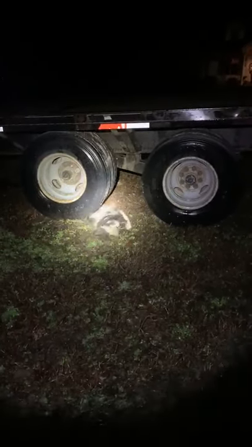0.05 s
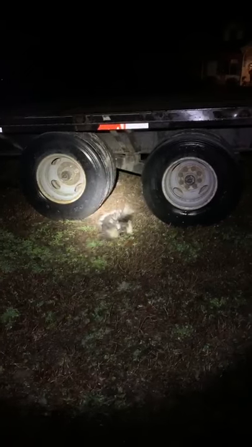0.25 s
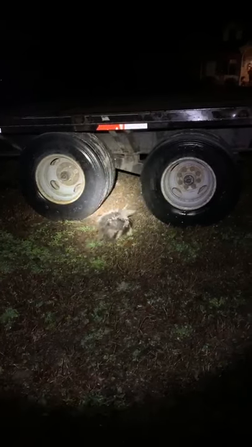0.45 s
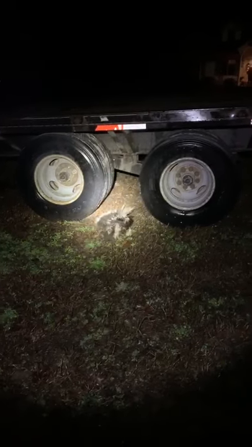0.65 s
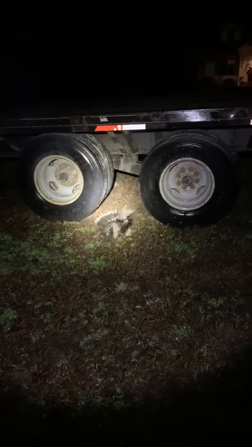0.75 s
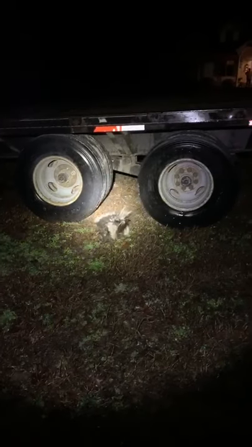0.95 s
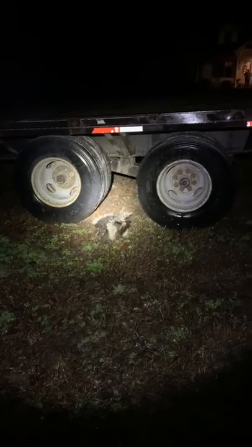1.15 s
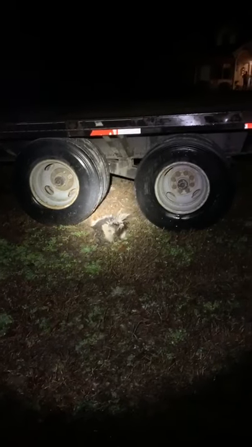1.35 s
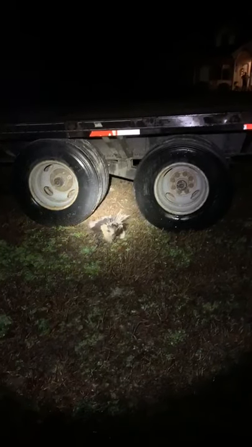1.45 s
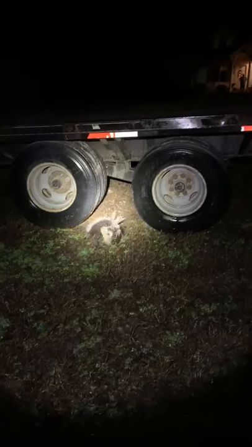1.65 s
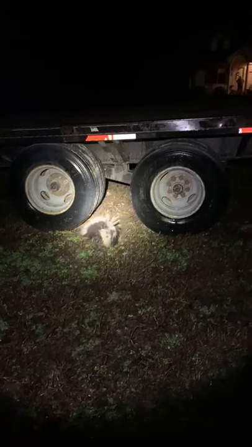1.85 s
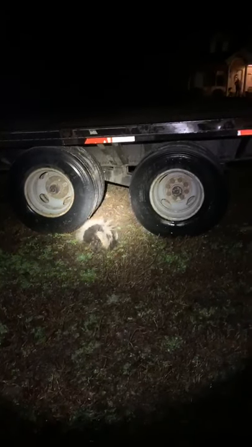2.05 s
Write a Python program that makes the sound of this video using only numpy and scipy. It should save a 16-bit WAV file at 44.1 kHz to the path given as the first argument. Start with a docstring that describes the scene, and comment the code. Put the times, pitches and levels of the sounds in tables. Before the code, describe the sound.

High, fluttering squeals break into rasp as skunks quarrel in a yard at night, twice at length and once briefly. Heard from a few metres off, they echo slightly, with soft grass scuffles, distant insects and a low hum behind.

```python
"""Under a trailer at night, skunks squabble a few metres away.
They give two long squeals and a short one. Each is a whistling voice near 2.4 kHz that a slower
flutter splits into side tones and that breaks into rasp. The squeals echo off the trailer.
The animals scuffle softly in the grass; insects chorus far off over a low rumble and hum."""
import sys
import numpy as np
from scipy import signal
from scipy.fft import rfft, irfft
from scipy.io import wavfile

SR = 44100
rng = np.random.default_rng(int(sys.argv[2]) if len(sys.argv) > 2 else 0)


def unload_audio(sound):
    """Save the sound as a 16-bit wav file, at the path given as the first command line argument."""
    columns = np.transpose(np.atleast_2d(sound))
    # keep every value between -1 and 1, then stretch to whole-number steps
    steps = np.round(np.clip(columns, -1, 1) * 32767)
    wavfile.write(sys.argv[1], SR, steps.astype(np.int16))


N = 92610
T = np.arange(N) / SR
HZ = np.fft.rfftfreq(N, 1 / SR)

# The tune of each squeal. Each row: time in seconds, pitch in Hz.
FIRST_PITCH = [(0.188, 2467), (0.204, 2461), (0.228, 2644), (0.242, 2754), (0.266, 2728), (0.285, 2664),
               (0.308, 2456), (0.336, 2513), (0.362, 2464), (0.372, 2317), (0.396, 2296), (0.412, 2161),
               (0.438, 2123), (0.455, 2150), (0.49, 2104)]
SECOND_PITCH = [(1.19, 1944), (1.206, 2040), (1.224, 2486), (1.23, 2460), (1.248, 2527), (1.274, 2354),
                (1.306, 2479), (1.35, 2494), (1.384, 2242), (1.404, 2225), (1.434, 2453), (1.452, 2356),
                (1.478, 2393), (1.505, 2340)]
THIRD_PITCH = [(1.795, 2431), (1.806, 2407), (1.815, 2651), (1.835, 2560), (1.87, 2590)]
# How loud each squeal is. Each row: time in seconds, base levels of harmonics one to three in dB.
FIRST_LEVELS = [(0.186, -58, -60, -83), (0.194, -47, -32, -70), (0.212, -35, -41, -53),
                (0.235, -22, -30, -43), (0.243, -27, -29, -42), (0.252, -21, -24, -38),
                (0.268, -20, -25, -39), (0.272, -29, -27, -41), (0.294, -34, -39, -47),
                (0.31, -36, -39, -50), (0.334, -33, -24, -39), (0.342, -34, -34, -36),
                (0.36, -34, -26, -40), (0.372, -34, -37, -45), (0.394, -33, -29, -42),
                (0.405, -43, -41, -49), (0.417, -34, -37, -43), (0.44, -38, -38, -43),
                (0.45, -32, -35, -41), (0.458, -43, -42, -49), (0.499, -55, -59, -65)]
SECOND_LEVELS = [(1.19, -55, -56, -79), (1.2, -31, -39, -55), (1.206, -40, -35, -56),
                 (1.214, -27, -34, -50), (1.234, -39, -26, -48), (1.262, -30, -26, -41),
                 (1.282, -31, -25, -44), (1.316, -27, -33, -38), (1.334, -36, -28, -38),
                 (1.342, -27, -35, -40), (1.35, -33, -31, -39), (1.364, -23, -29, -42),
                 (1.406, -33, -33, -52), (1.413, -28, -28, -46), (1.421, -34, -35, -47),
                 (1.433, -25, -24, -42), (1.443, -31, -33, -49), (1.457, -23, -26, -44),
                 (1.465, -36, -34, -46), (1.475, -22, -27, -48), (1.487, -29, -25, -51),
                 (1.503, -45, -50, -57), (1.511, -48, -51, -68)]
THIRD_LEVELS = [(1.793, -61, -64, -78), (1.797, -45, -35, -59), (1.799, -47, -28, -49),
                (1.819, -25, -34, -53), (1.825, -35, -35, -50), (1.835, -31, -37, -50),
                (1.875, -52, -57, -72)]
# How the voice breaks up. Each row: time in seconds, flutter depth, rasp depth.
FIRST_ROUGHNESS = [(.19, .2, .3), (.22, .08, .08), (.23, .55, .09), (.264, .75, .11), (.277, .9, .8),
                   (.305, .7, .85), (.33, .55, .22), (.356, .8, .25), (.37, .7, .5), (.39, .6, .3),
                   (.406, .8, .8), (.422, .4, .4), (.45, .6, .5), (.49, .6, 1.1)]
SECOND_ROUGHNESS = [(1.19, .5, .5), (1.215, .35, .25), (1.232, .2, .08), (1.246, .8, .15),
                    (1.259, .08, .06), (1.279, .08, .06), (1.29, .8, .13), (1.303, .15, .07),
                    (1.315, .5, .1), (1.326, .25, .08), (1.342, .9, .14), (1.353, .6, .14),
                    (1.366, 1.4, .22), (1.385, .4, .3), (1.41, .45, .3), (1.423, .8, .3), (1.436, .35, .2),
                    (1.455, 1.15, .25), (1.48, 1.2, .18), (1.505, .4, .6)]
THIRD_ROUGHNESS = [(1.795, .05, .1), (1.804, .1, .15), (1.812, .6, .45), (1.82, .45, .3), (1.832, 1.0, .5),
                   (1.87, .5, .7)]
# Harmonics, the tones at 1 to 4 times the pitch. Each row: dB added to the base level,
# strength of the side tones above, strength of those below, strength of the rasp.
VOICE_HARMONICS = [(-1.87, 0.73, 0.083, 0.93), (-0.86, 0.21, 0.29, 1.8), (1, 1.1, 0.7, 3),
                   (-7, 1.8, .8, 2.5)]
# Air hissing in the throat. Each row: frequency in Hz, relative level in dB.
BREATH_SPECTRUM = [(300, -14.5), (700, -21), (1300, -59), (2000, -29), (3000, 0.5), (5000, -8), (7000, -16),
                   (10500, 1.5), (12000, 20)]
# How the throat colours the voice. Each row: frequency in Hz, boost in dB.
THROAT_BOOST = [(1500, -1.8), (2500, 0.85), (2870, 4), (3250, 1), (3600, 2.5), (4300, -1.5), (4800, 0),
                (5900, 5.4), (6400, 1), (7300, -2), (8600, -0.1), (9000, -9.5), (9500, -1.9), (11000, -2.7)]
# Scuffles in the grass. Each row: peak time, rough rise time and rough fall time in seconds,
# level in dB, centre frequency in Hz, width in octaves.
GRASS_SCUFFLES = [(.278, 0.05, 0.062, -46, 844, 1), (.41, 0.11, 0.095, -56.5, 520, 0.81),
                  (0.623, 0.06, 0.069, -49, 962, 0.53), (.6, 0.017, .05, -54, 492, 0.2),
                  (1.42, .07, 0.11, -62.5, 556, 0.52), (1.506, 0.0053, 0.011, -49, 720, 0.2),
                  (1.88, 0.077, .07, -65, 650, 0.46)]
# Echoes off the trailer. Each row: delay in seconds, gain (a minus flips the wave).
TRAILER_ECHOES = [(.0023, .16), (.0037, .12), (.0051, -.17), (.0072, -.12), (.0094, .14), (.0131, -.09),
                  (.017, .08)]
# How long the yard rings. Each row: frequency in Hz, seconds to fade by 60 dB.
YARD_DECAY = [(300, .35), (2500, .38), (5000, 0.24), (10000, 0.65)]
# Far insects. Each row: centre frequency in Hz, half width in Hz, level in dB, throb depth.
INSECT_CHORUSES = [(2796, 304, -61, 0.072), (6230, 77, -93, 0.12)]
# One nearer insect. Each row: time in seconds, level in dB.
NEAR_INSECT_LEVEL = [(0, -81), (.2, -78.5), (.75, -97), (.95, -70.5), (1.15, -75), (1.6, -99.5),
                     (1.75, -77.5), (2.1, -91.5)]
# The rumble of the night air. Each row: frequency in Hz, relative level in dB.
RUMBLE_SPECTRUM = [(20, -34.5), (33, -27.5), (42, -4), (52, -5.5), (72, -5), (110, -4), (170, -5.5),
                   (300, -15.5), (420, -17), (560, -23.5), (800, -28.5), (1500, -32.5), (2100, -40),
                   (3400, -43), (5300, -54.5), (7000, -44.5), (10500, -48), (12500, -56.5)]
# The hum. Each row: frequency in Hz, level in dB.
HUM_TONES = [(72, -60), (216, -66)]
# Timing of direct sound at the two microphones. Each row: frequency in Hz, left's lead in radians.
DIRECT_PHASE = [(0, 0), (300, -.25), (750, .6), (1200, -.7), (2120, 0), (2350, 1.3), (2460, 2.2),
                (2750, 2.05), (2850, 1.65), (3050, 1.8), (4300, 1.55), (4800, 2.3), (5000, 2.55),
                (5200, 3.3), (5550, 3.4), (5700, 3.8), (6150, 3.95), (6550, 5), (7800, 6.1), (9150, 6.3),
                (9400, 7), (10800, 8.3)]
# Balance of direct sound, then of sound from all around. Each row: frequency in Hz, left minus right in dB.
DIRECT_BALANCE = [(60, -1.5), (200, -3.5), (340, -3.5), (700, -.8), (2050, -.3), (2370, -10), (2520, -1.2),
                  (2900, 0), (4200, 1), (4800, -.9), (6000, -.2), (11000, 0)]
AROUND_BALANCE = [(60, -2.3), (200, -2.5), (350, -4), (800, -0.1), (3000, 0.3)]
# How alike left and right are for sound from all around. Each row: frequency in Hz, likeness (1 = same).
AROUND_LIKENESS = [(50, .99), (150, .94), (400, .72), (1100, .65), (2000, .1), (2800, -.1), (10000, .2)]

TREMOR, TREMOR_HZ = .007, 70  # slight pitch shake: share of the pitch, speed
JITTER, JITTER_HZ = 0.024, 190  # faster pitch shake, at a rasp depth of 1
FLUTTER_RATIO, FLUTTER_WANDER = .196, .05  # flutter rate as a share of the pitch, and how much it strays
SIDE_FALL = .25  # gain from one side tone to the next
SHIMMER_DB, SHIMMER_HZ = 3.6, 65  # how far and how fast the side tones swell and fade
RASP_WIDTH_HZ = 360
BREATH_DB, TAIL_DB, RUMBLE_DB = -23.5, -20.5, -56.5
NEAR_INSECT_HZ, NEAR_INSECT_HALF_WIDTH_HZ = 4520, 300
TREBLE_LIMIT_HZ = 11300


def squeal(pitch, level, roughness):
    """A shrill voice: a slower flutter adds tones above and below each harmonic, and rasp smears it."""
    (hz,), levels, (flutter, rasp) = curves(pitch), curves(level), curves(roughness)
    start, end = level[0][0], level[-1][0]
    gate = np.clip(np.minimum(T - start, end - T) / 0.00085, 0, 1)
    shake = 1 + TREMOR * wander(TREMOR_HZ) + JITTER * rasp * wander(JITTER_HZ)
    phase = phase_of(hz * shake)
    flutter_hz = hz * FLUTTER_RATIO * (1 + FLUTTER_WANDER * wander(JITTER_HZ))
    beat = np.exp(1j * phase_of(flutter_hz))  # multiplying by this shifts a tone up by flutter_hz
    side_tones = beat * (1 + SIDE_FALL * beat * (1 + SIDE_FALL * beat))  # three, each weaker than the last
    voice = np.zeros(N)
    for order, (db, upper, lower, rasp_share) in enumerate(VOICE_HARMONICS, 1):
        up = flutter * upper * amp(SHIMMER_DB * wander(SHIMMER_HZ))
        down = flutter * lower * amp(SHIMMER_DB * wander(SHIMMER_HZ))
        smear = rasp_share * rasp * unit_level(wander(RASP_WIDTH_HZ) + 1j * wander(RASP_WIDTH_HZ))
        breakup = 1 + up * side_tones - down * side_tones.conj() + smear
        # Dividing by this size keeps a rough voice as loud as a smooth one.
        size = np.sqrt(1 + (up ** 2 + down ** 2) * (1 + SIDE_FALL ** 2) + (rasp_share * rasp) ** 2)
        tone = breakup / size * np.exp(1j * order * phase)
        base_db = levels[min(order - 1, 2)]  # the fourth harmonic follows the third
        voice += np.sqrt(2) * amp(base_db + db) * tone.real
    effort = np.hypot(amp(levels[0]), amp(levels[1]))
    hiss = noise(amp(at_hz(BREATH_SPECTRUM)))
    breath = amp(BREATH_DB) * effort * (.25 + 3.2 * rasp) * (1 + beat.real) * hiss
    return irfft(rfft(gate * (voice + breath)) * amp(at_hz(THROAT_BOOST)), N)


def yard_echoes(x):
    """Sound bounces quickly off the trailer, then leaves a faint outdoor tail."""
    near = x + sum(gain * np.interp(T - delay, T, x, left=0) for delay, gain in TRAILER_ECHOES)
    hz, t, tail_noise = signal.stft(rng.standard_normal((2, SR // 2)), SR, nperseg=256)
    fade_in = np.minimum(t / 0.0033, 1)
    fade_out = amp(-60 * t / at_hz(YARD_DECAY, hz)[:, None])
    tail = signal.istft(tail_noise * fade_out * fade_in, SR, nperseg=256)[1]
    ringing = signal.fftconvolve(x[None], tail / np.linalg.norm(tail[0]), axes=1)[:, :N]
    return direct_stereo(near) + amp(TAIL_DB) * ringing


def scuffles():
    """Bodies brush the ground in soft, grainy swells of noise."""
    out = np.zeros((2, N))
    for peak, rise, fall, db, hz, octaves in GRASS_SCUFFLES:
        from_peak = (T - peak) / np.where(T < peak, rise, fall)
        swell = np.exp(1 - np.sqrt(1 + 2 * from_peak ** 2)) ** 1.86
        band = np.exp(-.5 * (np.log2((HZ + 1) / hz) / octaves) ** 2)
        out += amp(db + 0.83 * wander(hz=150)) * swell * noise_all_around(band)
    return out


def insects():
    """Many far insects merge into narrow, throbbing bands of noise; a nearer one swells and fades."""
    def band(hz, half_width):
        return noise_all_around(1 / (1 + (abs(HZ - hz) / half_width) ** 5.5))
    chorus = sum(amp(db) * band(hz, half_width) * (1 + throb * wander(hz=41))
                 for hz, half_width, db, throb in INSECT_CHORUSES)
    swell = amp(curves(NEAR_INSECT_LEVEL)[0])
    return chorus + swell * band(NEAR_INSECT_HZ, NEAR_INSECT_HALF_WIDTH_HZ)


def rumble_and_hum():
    """A low, distant rumble with a hum whose pitch wavers."""
    hum = np.zeros(N)
    for hz, db in HUM_TONES:
        wavering_hz = hz * (1 + .012 * wander(hz=5.4))
        hum += np.sqrt(2) * amp(db) * np.sin(phase_of(wavering_hz))
    rumble = amp(RUMBLE_DB) * noise_all_around(amp(at_hz(RUMBLE_SPECTRUM)))
    return rumble + direct_stereo(hum)


def direct_stereo(x):
    """One sound reaches the two microphones with different timing and strength."""
    left = np.exp(.5j * at_hz(DIRECT_PHASE)) * amp(at_hz(DIRECT_BALANCE) / 2)
    pair = np.array([left, 1 / left])
    return irfft(rfft(x) * pair / np.sqrt((abs(pair) ** 2).mean(0)), N)


def noise_all_around(gain):
    """Noise from every direction, only partly alike on the left and right."""
    left, other = rfft(noise(gain)), rfft(noise(gain))
    likeness = np.clip(at_hz(AROUND_LIKENESS), -1, 1)
    right = likeness * left + np.sqrt(1 - likeness ** 2) * other
    tilt = amp(at_hz(AROUND_BALANCE) / 2)
    return irfft(np.array([left * tilt, right / tilt]), N)


def noise(gain):
    """Noise shaped by a gain for each frequency, at an average level of 1."""
    return unit_level(irfft(rfft(rng.standard_normal(N)) * gain, N))


def wander(hz):
    """A random wobble, up to about the given speed."""
    return noise(1 / (1 + (HZ / hz) ** 4) ** .5)


def phase_of(hz):
    """Adds up a changing frequency into the wave's angle in radians."""
    return 2 * np.pi * np.cumsum(hz) / SR


def amp(db):
    """Turns decibels into a gain."""
    return 10 ** (np.asarray(db) / 20)


def unit_level(x):
    """Scales a signal to an average (rms) level of 1."""
    return x / np.sqrt(np.mean(abs(x) ** 2) + 1e-20)


def at_hz(rows, hz=HZ):
    """Joins the rows of a frequency table with lines, on a scale of octaves."""
    row_hz, values = np.transpose(rows)
    return np.interp(np.log(hz + 1), np.log(row_hz + 1), values)


def curves(rows):
    """Turns each column of a time table into one value per sample."""
    seconds, *columns = np.transpose(rows)
    return [np.interp(T, seconds, column) for column in columns]


def scene():
    """The skunks in the yard, over the night background."""
    voices = (squeal(FIRST_PITCH, FIRST_LEVELS, FIRST_ROUGHNESS)
              + squeal(SECOND_PITCH, SECOND_LEVELS, SECOND_ROUGHNESS)
              + squeal(THIRD_PITCH, THIRD_LEVELS, THIRD_ROUGHNESS))
    return yard_echoes(voices) + scuffles() + insects() + rumble_and_hum()


def record(dry):
    """Cuts away the highest treble."""
    low_pass = signal.firwin(161, TREBLE_LIMIT_HZ, window=("kaiser", 5), fs=SR)
    return signal.oaconvolve(dry, low_pass[None], "same")


dry = scene()
out = record(dry)
unload_audio(out)
```